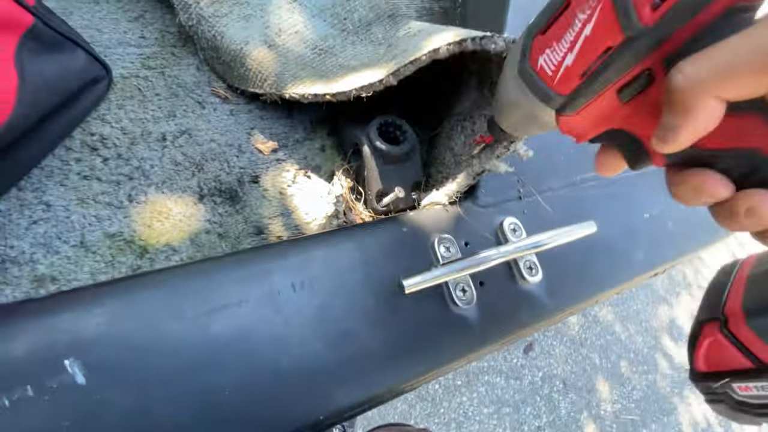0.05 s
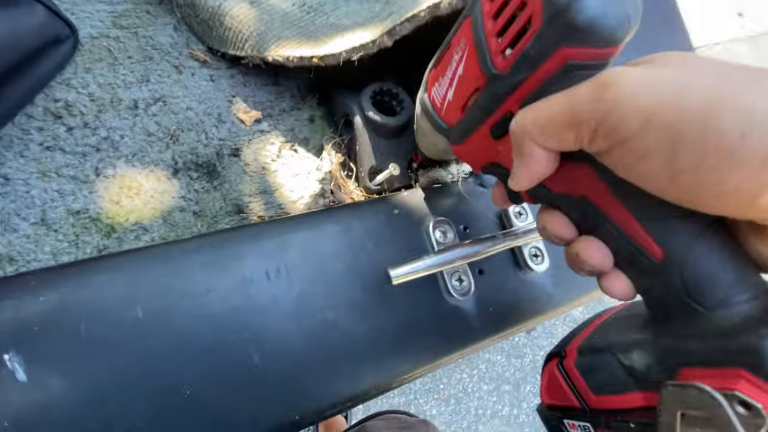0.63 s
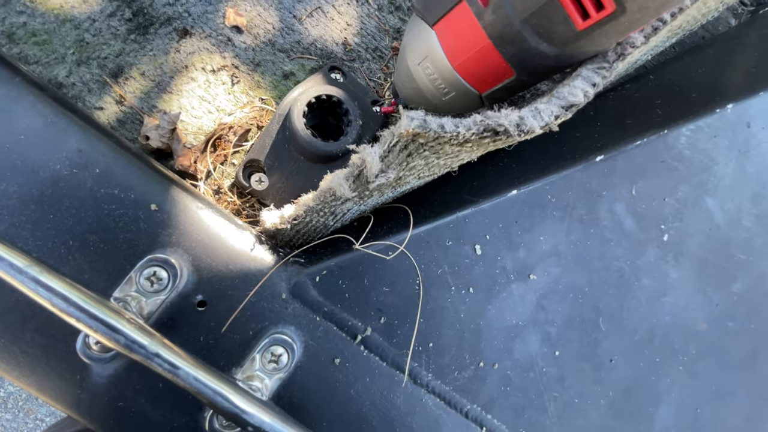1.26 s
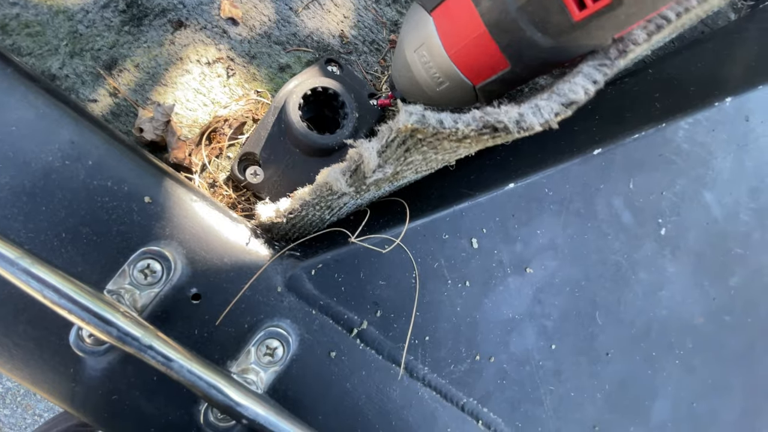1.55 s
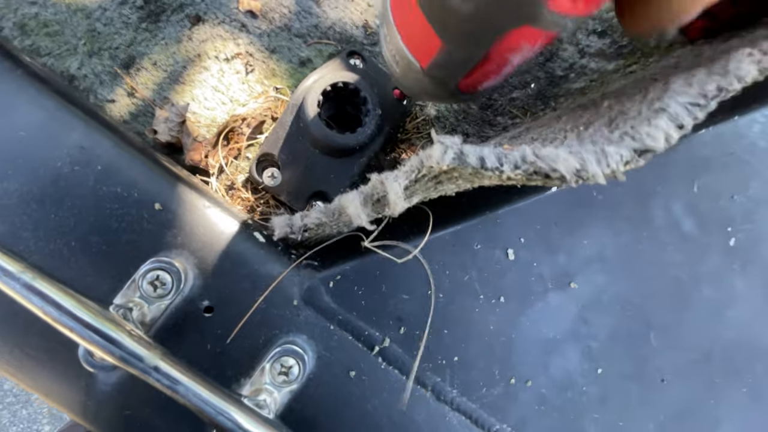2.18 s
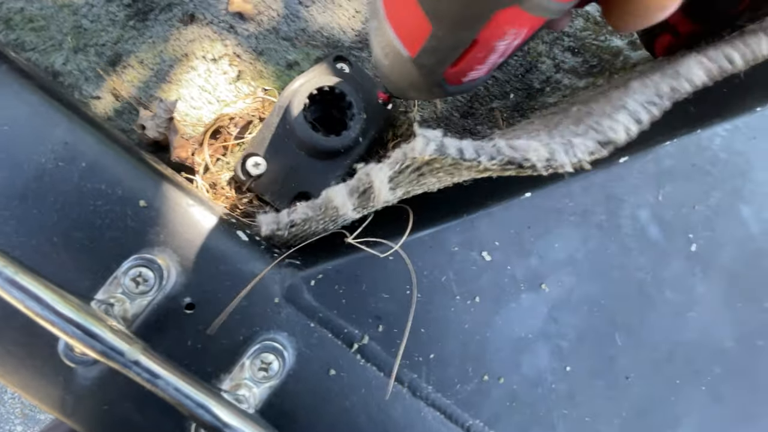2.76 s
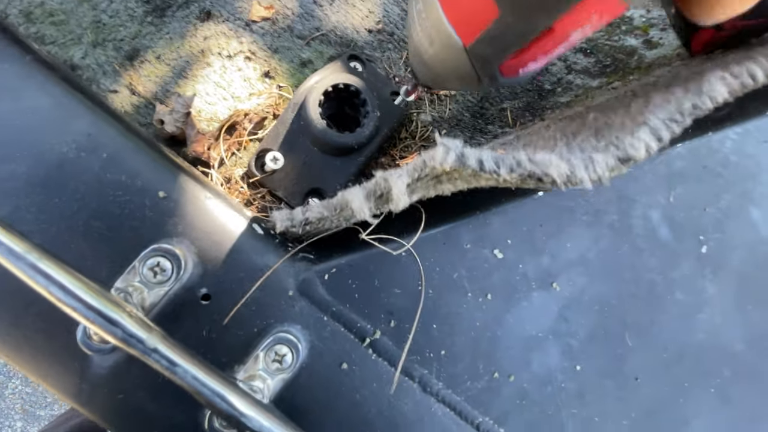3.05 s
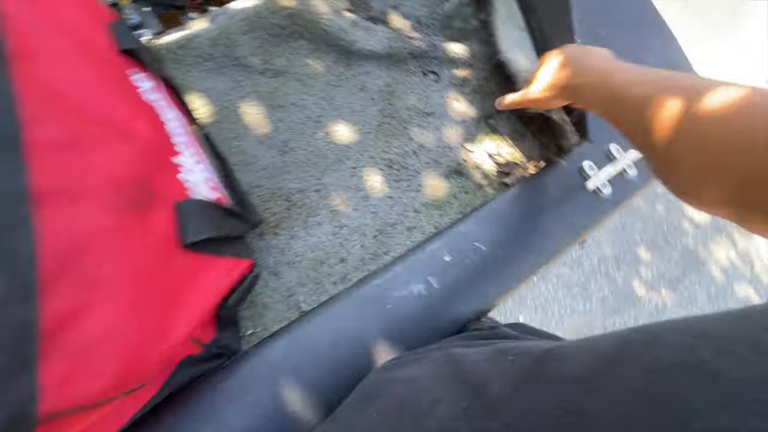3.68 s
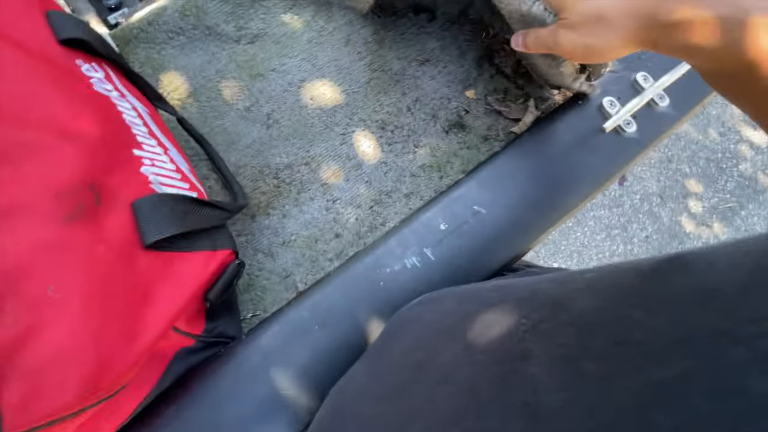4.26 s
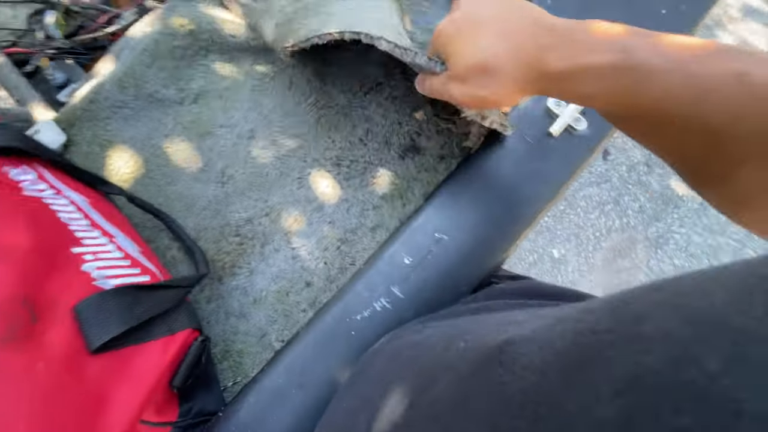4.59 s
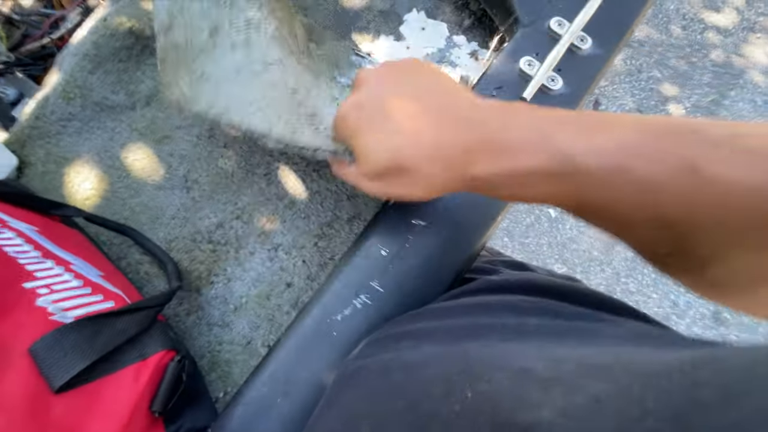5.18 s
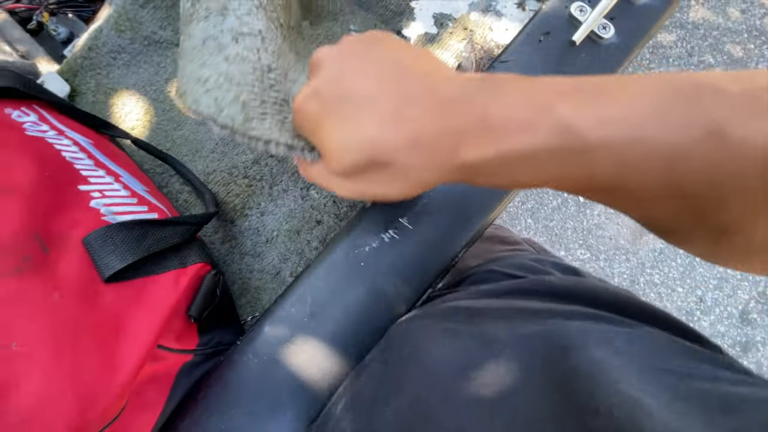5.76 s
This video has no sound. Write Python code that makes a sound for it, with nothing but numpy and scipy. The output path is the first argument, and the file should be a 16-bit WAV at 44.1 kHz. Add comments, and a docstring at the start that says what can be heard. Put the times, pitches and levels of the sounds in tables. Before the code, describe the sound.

Soft rustles, small clicks and hollow bumps come first as a cordless impact driver is lined up on a screw in a boat deck. Two quick hammering rattles lead into a short, wavering, high gear whine, which ticks to a stop. After that, glued carpet rips loose in repeated tugs, crackling sharply and thumping the metal hull. Everything is heard close up, outdoors, over faint, calm air.

```python
"""Outdoors on a metal boat deck, a stereo microphone close to the work, the air still.
A hand brushes the carpet, and a cordless impact driver ticks and knocks until its bit seats in a screw.
At about 2.5 s the hammer rattles twice; then the gears whine and the thread squeaks as the screw spins out.
From 3.7 s old glued carpet is torn off in several pulls: fibres snap and the hollow deck booms."""
import sys
import numpy as np
from scipy import signal
from scipy.fft import rfft, irfft, next_fast_len
from scipy.io import wavfile

SR = 44100
rng = np.random.default_rng(int(sys.argv[2]) if len(sys.argv) > 2 else 0)


def transcribe(u):
    """Save the signal u as a 16-bit wav file named by the first command-line argument.

    u: samples, shape (n,) or (channels, n), limited to [-1, 1]; the rate is SR.
    q: integer samples, one column per channel.
    """
    v = np.clip(np.atleast_2d(u).T, -1, 1)
    q = np.round(v * 32767).astype(np.int16)
    wavfile.write(sys.argv[1], SR, q)


N = 257087
TIME = np.arange(N) / SR
UNEVEN_DB = 2.5   # spread in strength from one contact to the next
GRIP_S = 3.708   # from here on the carpet is taut and creaks between pulls


def from_db(db):
    """Decibels to gain."""
    return 10 ** (np.asarray(db) / 20)


def rms_one(x):
    """Scale to unit rms."""
    return x / np.sqrt(np.mean(x ** 2) + 1e-20)


def noise():
    """White noise of unit rms."""
    return rng.standard_normal(N)


def drift(rate_hz):
    """A random wander of spread 1."""
    knots = rng.standard_normal(N // 10)
    return np.interp(TIME * 2 * rate_hz, np.arange(len(knots)), knots) * np.sqrt(3 / 2)


def filtered(x, order, hz, kind):
    """Low-, high- or band-pass filter."""
    return signal.sosfilt(signal.butter(order, hz, kind, fs=SR, output="sos"), x)


def colour(x, spectrum, size=4096):
    """Causal filter of unit energy that follows a spectrum and falls steeply beyond its ends."""
    hz, db = np.transpose(spectrum)
    octave, known = np.log2(np.arange(size // 2 + 1) * SR / size + 1), np.log2(hz)
    curve = np.interp(octave, known, db) - 30 * np.abs(octave - np.clip(octave, known[0], known[-1]))
    cepstrum = irfft(np.log(from_db(curve) + 1e-5))
    causal = 2 * cepstrum[:size // 2] * (np.arange(size // 2) > 0)
    response = irfft(np.exp(rfft(causal, size)))
    return signal.oaconvolve(x, response / np.linalg.norm(response))[:N]


def swells(rows, attack_db_per_s, release_db_per_s):
    """Gain for rows of start_s, length_s, level_db: each rises, holds for its length and dies away."""
    levels = [db - attack * np.maximum(s - TIME, 0) - release_db_per_s * np.maximum(TIME - s - length, 0)
              for s, length, db, attack in np.broadcast(*np.transpose(rows), attack_db_per_s)]
    return from_db(np.max(levels, axis=0)) + 1e-9


def grains(per_s, spread_db):
    """Random breaks of uneven size; mean power 1 at rates up to one a sample."""
    sizes = from_db(spread_db * np.minimum(rng.exponential(1, N), 4))
    signed = rms_one(sizes * rng.choice([-1, 1], N))
    return signed * (rng.random(N) < per_s / SR) * np.sqrt(SR / per_s)


def bursts(times, levels_db, t60, rise_ms, size=6000):
    """Each contact is a spray of tiny impacts that builds up and dies within t60."""
    out, age = np.zeros(N + size), np.arange(size) / SR
    fade = from_db(-60 * age / t60) * (1 - np.exp(-1000 * age / rise_ms))
    for s, db in zip(times, levels_db):
        out[int(s * SR):][:size] += from_db(db) * fade / fade.max() * rng.standard_normal(size)
    return out[:N]


def pushes(times, levels_db, soft_ms, size=1024):
    """Force pulses of given area; a soft contact is a long pulse."""
    out, ms = np.zeros(N + size), np.arange(1, size + 1) * 1000 / SR
    pulse = np.exp(-ms / soft_ms)
    for s, db in zip(times, levels_db):
        out[int(s * SR):][:size] += from_db(db) * pulse / pulse.sum()
    return out[:N]


def ring(force, modes, uneven_db=UNEVEN_DB):
    """A body's modes; their strengths change from blow to blow."""
    out = np.zeros(N)
    for k, (hz, db, t60) in enumerate(modes):
        r, w = from_db(-60 / (t60 * SR)), 2 * np.pi * hz / SR
        drive = force * from_db(db + uneven_db * drift(20)) + 1e-18
        out += (-1) ** k * signal.lfilter([0, np.sin(w)], [1, -2 * r * np.cos(w), r * r], drive)
    return out


# spectrum of the open air: frequency_hz, level_db (levels in all tables are relative)
AIR = [(25, -27), (60, 0.5), (114, -8), (460, -20.5), (1200, -33.5), (5600, -46.5), (11000, -52),
       (16000, -82.5)]

def air():
    """Still outdoor air, a little different on each side of the microphone."""
    mid, side = colour(noise(), AIR), from_db(-1) * colour(noise(), AIR)
    return from_db(-55) * np.array([mid + side, mid - side])


# hand and tool brush the pile: start_s, length_s, level_db
BRUSH = [(0.0, 0.078, -57), (0.085, 0.02, -53), (0.59, 0.037, -64.5), (0.93, 0.085, -60),
         (1.13, 0.047, -63.5), (1.56, 0.041, -65.5), (2.04, 0.033, -61.5), (2.1, 0.044, -55),
         (2.26, 0.073, -62.5)]
# spectrum of the brushed pile: frequency_hz, level_db
RUSTLE = [(400, 7), (1400, -5), (2600, -2), (6000, -9), (9500, -10), (11200, -6), (14000, -41)]
# weight is put on the tool: start_s, length_s, level_db
LEANS = [(1.0, 1.84, -46), (2.14, 0.0055, -29), (2.8, 0.47, -31.5)]
# spectrum of the hull's boom: frequency_hz, level_db
BOOM = [(45, -20), (66, 9), (95, -0.5), (145, 3), (190, -5), (260, -3), (350, -7)]

def handling(fade_db_per_s=379):
    """The pile rustles unevenly, and the hull rumbles dully as the hand shifts."""
    strokes = swells(BRUSH, fade_db_per_s, fade_db_per_s) * from_db(UNEVEN_DB * drift(29))
    rustle = strokes * colour(grains(per_s=1300, spread_db=2.0), RUSTLE)
    weight = swells(LEANS, attack_db_per_s=403, release_db_per_s=183)
    rumble = rms_one(filtered(colour(noise(), BOOM), 1, 190, "low"))
    return rustle + from_db(-3.5) * weight * rumble


# the bit taps the mount and shifts in the screw head: start_s, level_db
TICKS = [(0.2905, -43.5), (1.253, -45.5), (1.3629, -43.5), (1.438, -47.5), (2.389, -44), (2.404, -37.5),
         (3.54, -45), (3.592, -52)]
# the spindle coasts down: start_s, end_s, first_gap_s, level_db
COASTS = [(0.8804, 1.22, 0.0088, -50), (3.3093, 3.378, 0.0132, -27.5)]
# spectrum of the gears, close up: frequency_hz, level_db
GEARS = [(410, -15.5), (700, -19.5), (1140, -25), (2190, -8), (2840, -11), (3450, -4.5), (3840, -12),
         (5330, -9.5), (7390, -17), (9600, -9.5), (10700, -10.5), (12200, -18), (13500, -36)]
# modes of the bit: pitch_hz, level_db, t60_s
BIT = [(3270, -25, 0.0776), (5080, 13.5, 0.0036)]
# modes of the plastic mount that holds the screw: pitch_hz, level_db, t60_s
MOUNT = [(335, -0.5, 0.06), (738, -7.5, 0.042), (1010, -2.5, 0.0079), (1770, -14, 0.0057)]

def ticks(gap_growth=0.078, chatter_s=0.006, chatter_db=-7):
    """The bit taps and coasting gears tick ever more slowly; bit and mount ring until the motor starts."""
    coasting = []
    for start, end, gap, level in COASTS:
        times = start + gap * ((1 + gap_growth) ** np.arange(32) - 1) / gap_growth
        coasting += [(t, level) for t in times[times < end]]
    s, db = np.transpose(coasting + list(TICKS))
    twins = s + chatter_s * rng.uniform(-0.82, 1, len(s))   # play in the gears doubles each tick
    taps = bursts(np.r_[s, twins], np.r_[db, db + chatter_db], t60=0.013, rise_ms=0.79)
    taps *= from_db(0.88 * drift(40.35))
    clicks = from_db(-11) * filtered(colour(taps, GEARS), 2, 1900, "high")
    resting = taps * (TIME < TRIGGER[0][0])
    return clicks + from_db(-31.5) * ring(resting, BIT) + from_db(-24.5) * ring(resting, MOUNT)


# the driver bumps the deck: start_s, click_db, thud_db
KNOCKS = [(0.299, -42, -35), (0.5752, -31.5, -47), (0.592, -42, -35), (0.9348, -35, -29.5),
          (1.16, -50, -38.5), (1.5976, -42, -35.5), (2.0066, -45, -30), (2.1271, -48, -31.5),
          (3.1705, -20, -29)]
# spectrum of the driver's clank: frequency_hz, level_db
CLANK = [(260, -27.5), (450, 1.5), (850, -26), (1020, -8), (1210, -16.5), (2580, -8.5), (5880, -12),
         (9770, -22), (11000, -8.5), (16000, -56.5)]
# modes of the hollow deck: pitch_hz, level_db, t60_s
DECK = [(86.66, -6, 0.46), (156, -8.5, 0.23), (234.2, 0, 0.15), (263.5, -1, 0.13), (315.8, -2.5, 0.086),
        (365.5, -0.5, 0.12), (444.7, -7, 0.13), (569, -5, 0.073), (823, -9.5, 0.1)]

def knocks():
    """The tool bumps the deck: a click, a hollow thud and a short shudder of the hull."""
    s, click_db, thud_db = np.transpose(KNOCKS)
    click = from_db(-4) * colour(bursts(s, click_db, t60=0.015, rise_ms=0.33), CLANK)
    shudder = from_db(-3.5) * colour(bursts(s, thud_db, t60=0.25, rise_ms=0.57), BOOM)
    thud = from_db(-0.5) * ring(pushes(s, thud_db, soft_ms=0.58), DECK, uneven_db=4.5)
    return click + shudder + thud


# the bit drops into the screw head: start_s, level_db
SEATING = [(0.853, -22)]

def seating():
    """The bit slips home and the plastic mount rings briefly."""
    s, db = np.transpose(SEATING)
    click = from_db(-5.5) * colour(bursts(s, db, t60=0.012, rise_ms=1.8), CLANK)
    return click + from_db(3) * ring(pushes(s + 0.00434, db, soft_ms=0.08), MOUNT, uneven_db=-0.5)


# squeezes of the trigger: start_s, held_s
TRIGGER = [(2.469, 0.078), (2.69, 0.605)]
# gear whine as the screw spins out: time_s, pitch_hz
SPEED = [(2.761, 4645), (2.87, 3280), (2.906, 3070), (2.98, 4780), (3.026, 5347), (3.1, 4510), (3.15, 4354),
         (3.2, 5286), (3.255, 5630), (3.282, 4634)]

def motor(full_speed_hz=5200, teeth=18, gear_db=-31.5, load_db=7.5):
    """Gears throb with each turn, grind louder under load and rattle the deck; once free, they whine."""
    whine_hz = np.interp(TIME, *np.transpose(SPEED)) * (1 + 0.008 * drift(300))
    speed, phase = whine_hz / full_speed_hz, 2 * np.pi * np.cumsum(whine_hz) / SR
    loose_s, stop_s = SPEED[0][0], SPEED[-1][0]
    load = 1 - np.clip((TIME - loose_s) / 0.073, 0, 1)
    mesh = noise() * (1 + 0.5 * np.cos(phase / teeth)) * from_db(1.4 * drift(82))
    grind = from_db(load_db * load) * colour(mesh, GEARS)
    rattle = from_db(-9) * rms_one(ring(mesh, DECK))
    octave = from_db(6) * speed ** 5.3 * np.sin(2 * phase)   # takes over near full speed
    fade = np.clip((TIME - loose_s) / 0.12, 0, 1) * np.clip((stop_s - TIME) / 0.017, 0, 1)
    flutter = from_db(1 + 3 * drift(90))
    whine = fade * flutter * (np.sin(phase) + octave)
    squeezes = [(s, held, gear_db) for s, held in TRIGGER]
    running = swells(squeezes, attack_db_per_s=722, release_db_per_s=481.5)
    return running * speed ** 0.97 * (grind + rattle), running * whine


# hammer on anvil: start_s, level_db
BLOWS = [(2.4812, -4), (2.488, -4), (2.4967, -9), (2.5218, -7), (2.55, -4.5), (2.5712, -13.5),
         (2.6941, -4.5), (2.7015, -7.5), (2.7304, -4), (2.7588, -7)]
# modes of the driver's steel: pitch_hz, level_db, t60_s
STEEL = [(1026, -2.5, 0.056), (2165, -5.5, 0.03), (2630, 5, 0.012), (5885, -16.5, 0.01)]

def hammer():
    """Each blow clanks in the driver and goes through the screw into the deck."""
    s, db = np.transpose(BLOWS)
    crack = bursts(s, db, t60=0.016, rise_ms=0.59)
    steel = from_db(-4.5) * colour(crack, CLANK) + from_db(-35.5) * ring(crack, STEEL)
    boom = from_db(-17) * colour(bursts(s, db, t60=0.07, rise_ms=5.7), BOOM)
    return steel + boom + from_db(-9.5) * ring(pushes(s, db, soft_ms=0.45), DECK)


# the thread squeaks in its hole: centre_s, pitch_hz, level_db
SQUEAKS = [(2.901, 7400, -36), (2.935, 6070, -27), (2.968, 6600, -30.5)]

def squeaks(jitter=0.05, flutter_db=4):
    """Short, rough, rising chirps that break up as the thread sticks and slips."""
    out = np.zeros(N)
    for s, hz, db in SQUEAKS:
        pitch = hz * (1 + 5 * np.clip(TIME - s, -.02, .02) + jitter * drift(500))
        envelope = from_db(db + flutter_db * drift(250)) * np.exp(-((TIME - s) / 0.012) ** 2)
        out += envelope * np.sin(2 * np.pi * np.cumsum(pitch) / SR)
    return out


# pulls that tear the carpet loose:
# start_s, length_s, attack_db_per_s, fibres_db, backing_db, deck_db, flap_hz, flap_db
PULLS = [(3.94, 0.092, 497, -37.5, -44, -37.5, 510, -40),
         (4.08, 0.024, 420, -27.5, -30.5, -19.5, 372, -17.5),
         (4.277, 0.032, 600, -38.5, -39, -43, 580, -53), (4.398, 0.016, 332, -24.5, -28, -18.5, 413, -25),
         (4.567, 0.054, 550, -34.5, -39.5, -40, 1660, -52),
         (4.634, 0.061, 298, -34, -32.5, -29.5, 497, -41), (4.835, 0.027, 500, -40, -41, -38.5, 910, -57),
         (5.04, 0.047, 745, -22.5, -24, -19, 970, -31), (5.195, 0.096, 420, -34.5, -41, -33.5, 880, -43.5),
         (5.272, 0.04, 802, -30, -38.5, -31.5, 910, -37.5),
         (5.365, 0.088, 1500, -29, -33.5, -29.5, 1430, -43),
         (5.541, 0.094, 1300, -30.5, -31, -28.5, 990, -44), (5.611, 0.13, 300, -30.5, -28.5, -28, 420, -36),
         (5.747, 0.092, 500, -37, -34.5, -29.5, 484, -36)]
# spectrum of snapping fibres, close up: frequency_hz, level_db
FIBRES = [(1180, -31.5), (2000, -7), (3980, -12.5), (5490, -2), (6640, -4.5), (8780, 0.5), (10300, 4),
          (11300, 3.5), (12500, -13), (13700, -26.5), (16000, -32)]
# spectrum of the flexing backing: frequency_hz, level_db
BACKING = [(300, -9.5), (480, -2), (740, -8), (990, -6.5), (1300, -11.5), (2100, -19), (2700, -19.5)]

def carpet(flap_q=1.64):
    """Fibres break in clumps, faster under a harder pull, shaking the backing, lifted flap and deck."""
    s, length, attack, fibres_db, backing_db, deck_db, flap_hz, flap_db = np.transpose(PULLS)

    def strain(pull_db, taut_db, release_db_per_s):
        """The pulls swell above the steady creak of taut carpet."""
        pulls = swells(np.c_[s, length, pull_db], attack, release_db_per_s)
        return np.hypot(pulls, (TIME > GRIP_S) * from_db(taut_db))

    fibres = strain(fibres_db, taut_db=-51.5, release_db_per_s=503)
    backing = strain(backing_db, taut_db=-46, release_db_per_s=423)
    boom = strain(deck_db, taut_db=-41, release_db_per_s=274)
    breaks = grains(per_s=500 + 140000 * fibres, spread_db=2.5)
    clumped = rms_one(breaks * from_db(1.08 * drift(130)))
    crackle = from_db(2) * colour(clumped * fibres, FIBRES)
    crackle += from_db(-1.5) * colour(clumped * backing, BACKING)
    for pull, rise, hz in zip(np.c_[s, length, flap_db], attack, flap_hz):
        peak = signal.iirpeak(hz, flap_q, fs=SR)
        flap = rms_one(signal.lfilter(*peak, signal.lfilter(*peak, clumped)))
        crackle += from_db(-4) * swells([pull], rise, release_db_per_s=423) * flap
    return crackle + from_db(-2.5) * colour(breaks * boom, BOOM)


# the largest tufts and patches of glue let go: start_s, crack_db, backing_db, deck_db, pitch_hz
SNAPS = [(3.711, -41, -40.5, -34.5, 1140), (3.9492, -13, -53.5, -59, 2840),
         (4.0236, -20, -25.5, -19.5, 2950), (4.059, -4.5, -14, -8.5, 484), (4.1546, -15, -30, -48, 1620),
         (4.198, -18.5, -33.5, -52, 2100), (4.2495, -15, -37, -49, 2110), (4.301, -18, -36, -46, 2260),
         (4.349, -14.5, -33, -51, 1940), (4.367, -14, -27, -44, 2140), (4.4789, -16.5, -39, -42, 1410),
         (4.6067, -10.5, -34, -40, 1700), (4.6454, -15.5, -37, -36, 1880), (4.6857, -10, -29.5, -33, 1310),
         (4.8098, -18, -41, -50, 2000), (4.9661, -16, -29.5, -40, 2040), (5.0392, -15, -14, -36, 970),
         (5.0568, -6, -19.5, -25, 1490), (5.2682, -17, -29, -41, 1000), (5.303, -23, -27.5, -38, 2270),
         (5.3642, -14.5, -19.5, -32, 2220), (5.4069, -13, -18, -32, 2140), (5.547, -29, -30.5, -43, 2420),
         (5.7088, -12.5, -33, -19, 2350)]

def snaps(small_per_s=9, ring_t60_s=0.012):
    """A tuft cracks loose; the stiff backing rings and thumps the deck. Small tufts go at random."""
    s, crack_db, backing_db, deck_db, ring_hz = np.transpose(SNAPS)
    small_s = TIME[(rng.random(N) < small_per_s / SR) & (TIME > GRIP_S)]
    small_db = -32 + UNEVEN_DB * rng.standard_normal(len(small_s))
    cracks = bursts(np.r_[s, small_s], np.r_[crack_db, small_db], t60=0.011, rise_ms=0.14)
    flick = from_db(-0.7) * colour(bursts(s, backing_db, t60=0.014, rise_ms=0.052), BACKING)
    age = np.arange(1024) / SR
    for start, db, hz in zip(s, backing_db, ring_hz):
        fade = from_db(db + 8 - 60 * age / ring_t60_s)
        flick[int(start * SR):][:len(age)] += fade * np.sin(2 * np.pi * hz * age)
    thump = from_db(-10) * ring(pushes(s, deck_db, soft_ms=0.34), DECK)
    return from_db(-4.96) * colour(cracks, FIBRES) + flick + thump


def later(x, ms):
    """Delay a sound."""
    size = next_fast_len(N + 2048, True)
    hz = np.arange(size // 2 + 1) * SR / size
    return irfft(rfft(x, size) * np.exp(-2j * np.pi * hz * ms / 1000), size)[:N]


def place(x, lag_ms, low_lag_ms, pan_db, scatter_db, scatter_t60, shade_hz, shade_db, hull_db, shift_hz,
          beamed=0, count=6, size=2000):
    """Sound reaches the microphone's right port later, with one band louder or softer there.
    Hull reflections differ at each port and shift as the hand moves; a beamed sound has none."""
    direct = x + beamed
    # lows bend round the microphone and arrive later still
    bent = signal.sosfiltfilt(signal.butter(4, 3480, "low", fs=SR, output="sos"), direct)
    right = later(direct - bent, lag_ms) + later(bent, low_lag_ms)
    tails = rng.standard_normal((count, 2, size)) * from_db(-60 * np.arange(size) / (SR * scatter_t60))
    tails /= np.linalg.norm(tails, axis=2, keepdims=True)
    tails = filtered(tails, 2, [480, 6000], "band") + from_db(hull_db) * filtered(tails, 1, 300, "low")
    scattered = sum(signal.oaconvolve(x[None], pair, axes=1)[:, :N] * np.cos(np.pi * drift(shift_hz))
                    for pair in tails)
    both = np.array([direct, right]) + from_db(scatter_db) * scattered * np.sqrt(2 / count)
    band = signal.lfilter(*signal.iirpeak(shade_hz, 2, fs=SR), both)
    shaded = both + band * (from_db([[-shade_db / 2], [shade_db / 2]]) - 1)
    return shaded * from_db([[pan_db / 2], [-pan_db / 2]])


def scene():
    """Driver, hand and carpet are all close to the microphone, near centre, with open air around."""
    gears, whine = motor()
    driver = place(gears + squeaks() + hammer(), lag_ms=0.1596, low_lag_ms=0.25, pan_db=0.1,
                   scatter_db=1.84, scatter_t60=0.026, shade_hz=724, shade_db=-6.0,
                   hull_db=-19.5, shift_hz=10, beamed=whine)
    hand = place(knocks() + seating() + handling(), lag_ms=0.16, low_lag_ms=0.26, pan_db=2.0,
                 scatter_db=1.0, scatter_t60=0.052, shade_hz=4400, shade_db=2.5,
                 hull_db=-13, shift_hz=3)
    tearing = place(carpet() + snaps(), lag_ms=0.238, low_lag_ms=0.3, pan_db=-0.96,
                    scatter_db=2.5, scatter_t60=0.024, shade_hz=5200, shade_db=8.5,
                    hull_db=-9.5, shift_hz=12)
    return air() + hand + ticks() + driver + tearing


def record(dry, ceiling=1.3, stop_hz=17300):
    """The loudest peaks at the microphone are rounded and the top is cut."""
    rounded = ceiling * np.tanh(dry / ceiling)
    return signal.sosfilt(signal.cheby2(16, 70, stop_hz, fs=SR, output="sos"), rounded)


dry = scene()
out = record(dry)
transcribe(out)
```